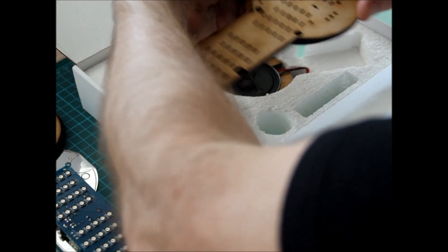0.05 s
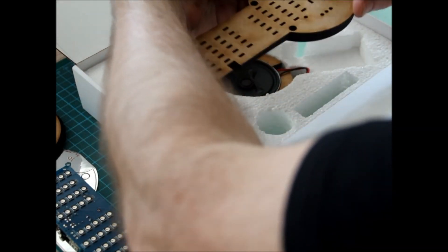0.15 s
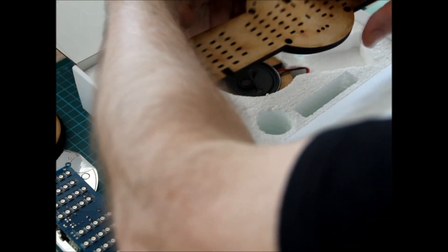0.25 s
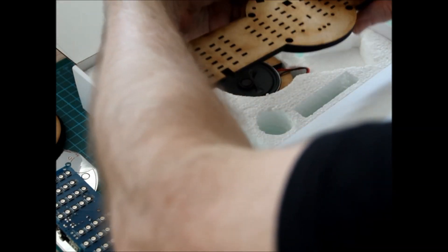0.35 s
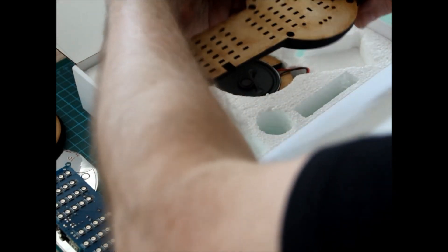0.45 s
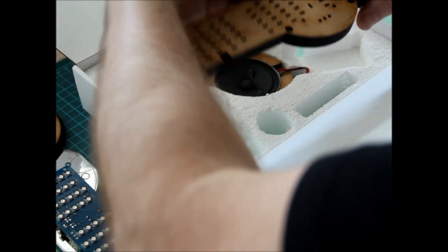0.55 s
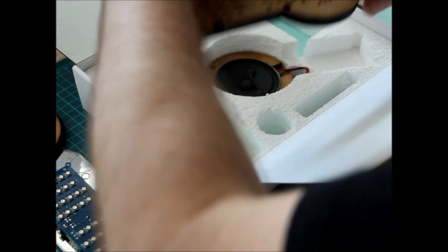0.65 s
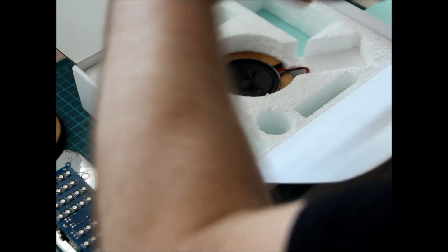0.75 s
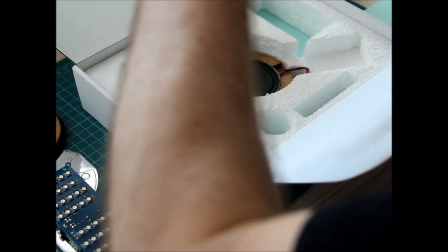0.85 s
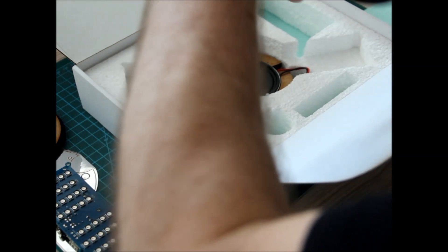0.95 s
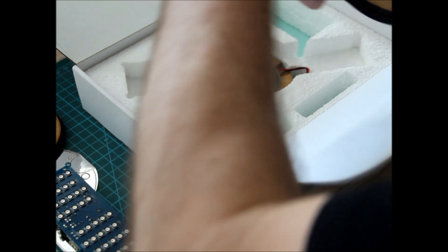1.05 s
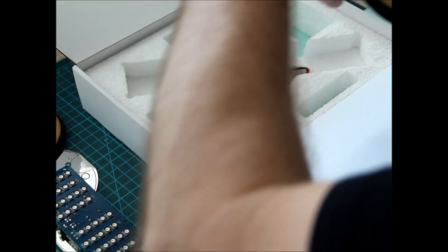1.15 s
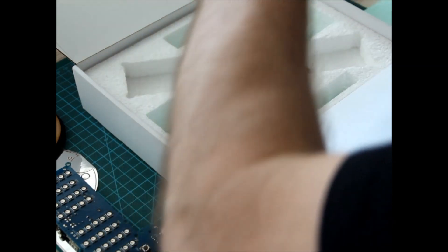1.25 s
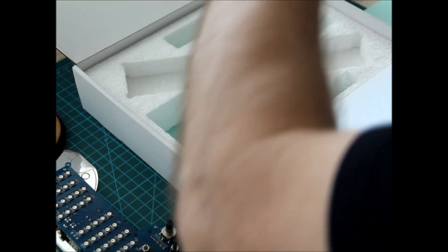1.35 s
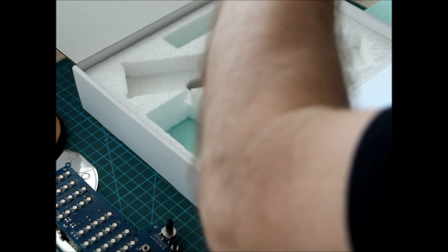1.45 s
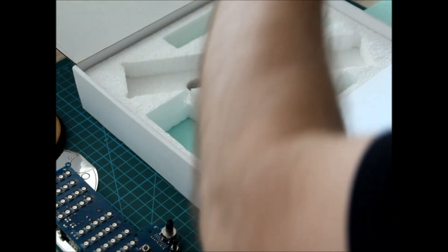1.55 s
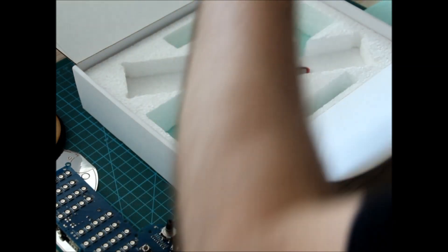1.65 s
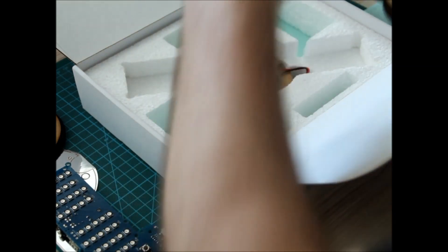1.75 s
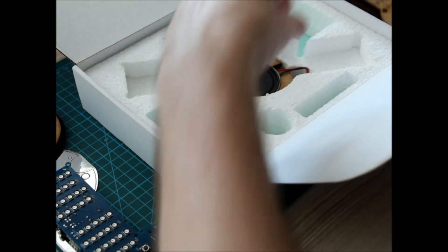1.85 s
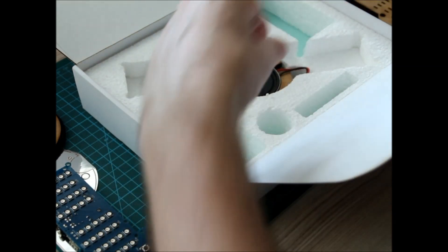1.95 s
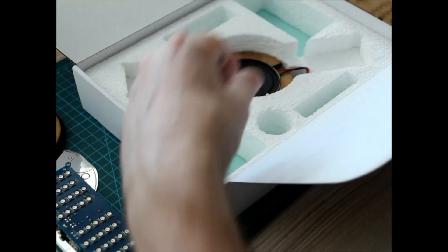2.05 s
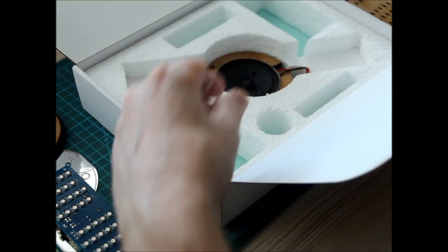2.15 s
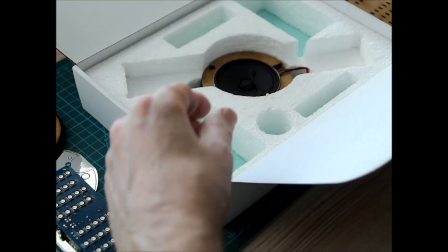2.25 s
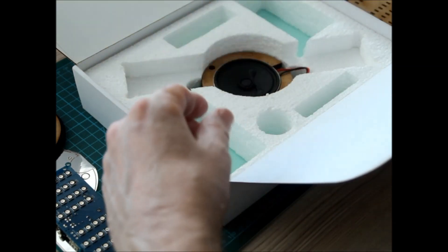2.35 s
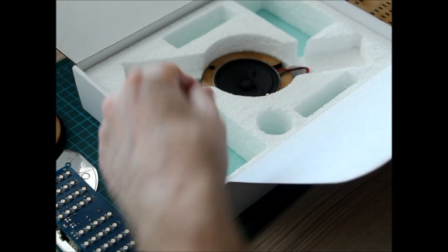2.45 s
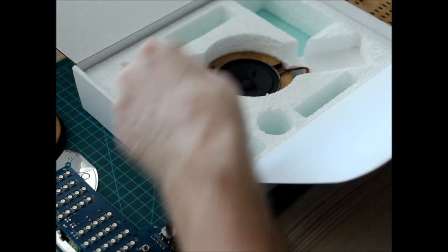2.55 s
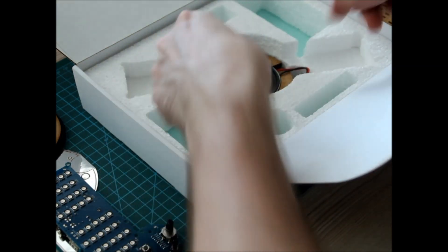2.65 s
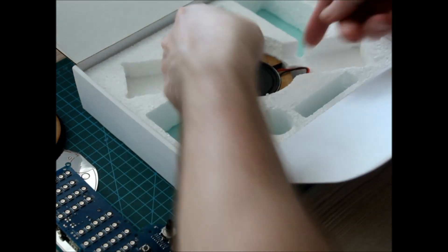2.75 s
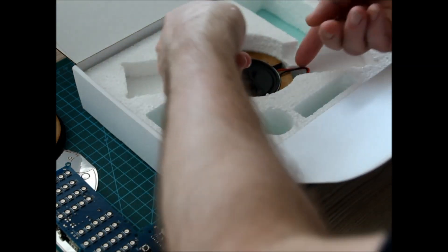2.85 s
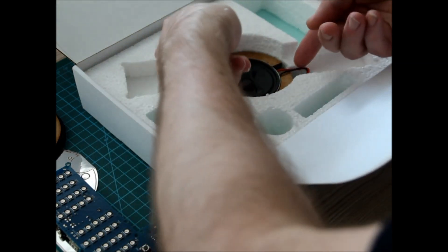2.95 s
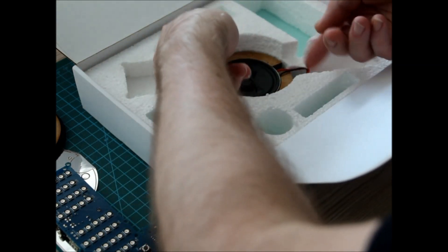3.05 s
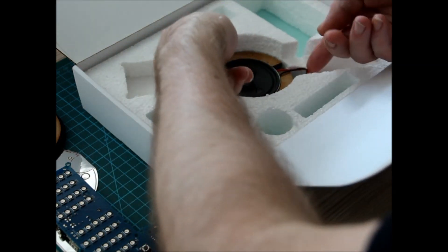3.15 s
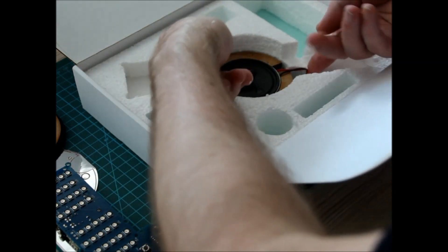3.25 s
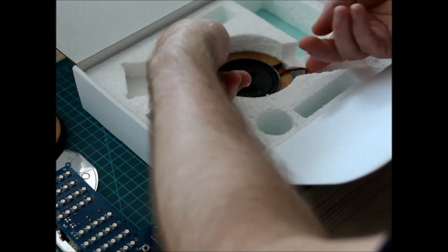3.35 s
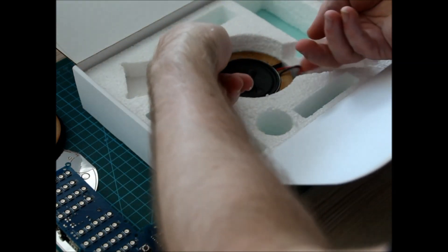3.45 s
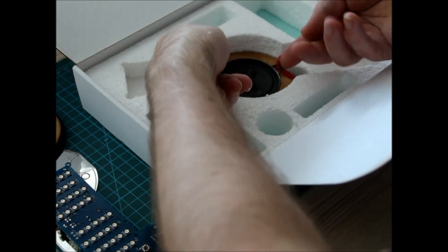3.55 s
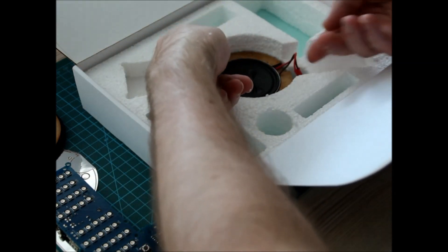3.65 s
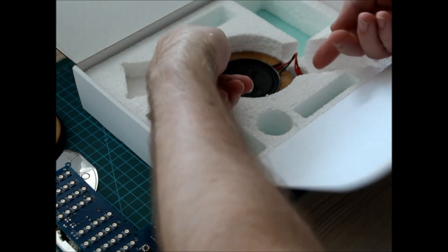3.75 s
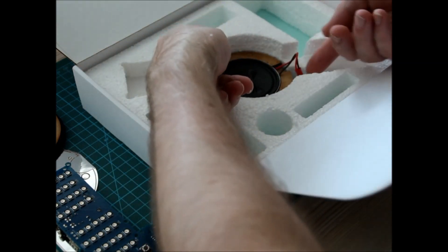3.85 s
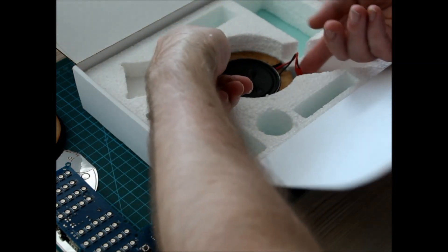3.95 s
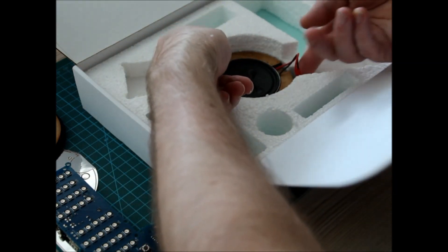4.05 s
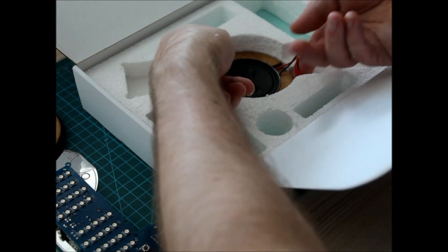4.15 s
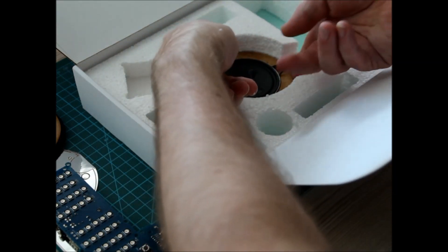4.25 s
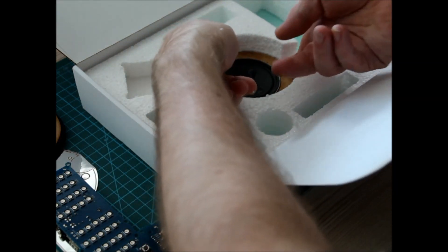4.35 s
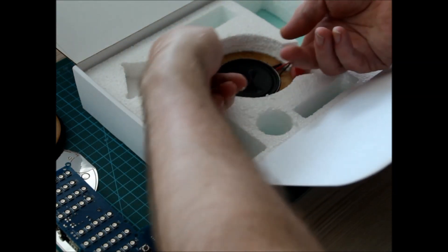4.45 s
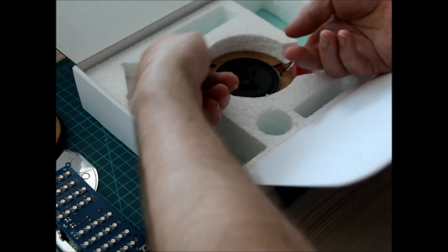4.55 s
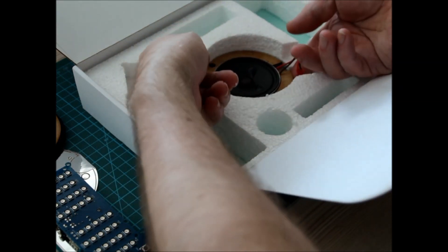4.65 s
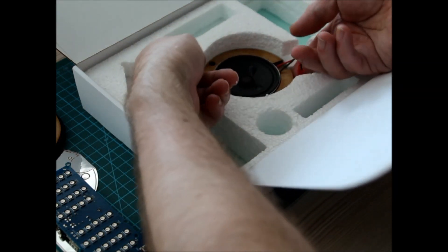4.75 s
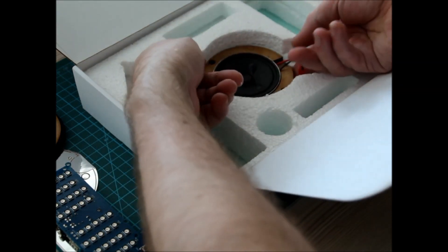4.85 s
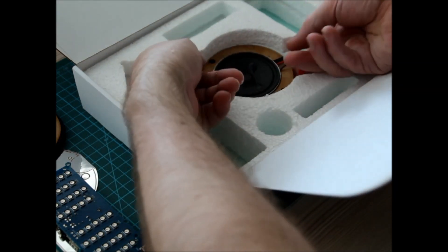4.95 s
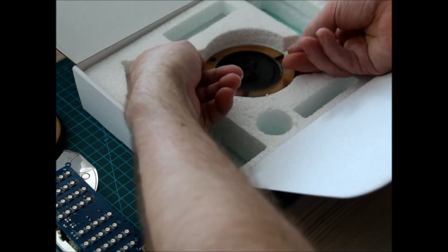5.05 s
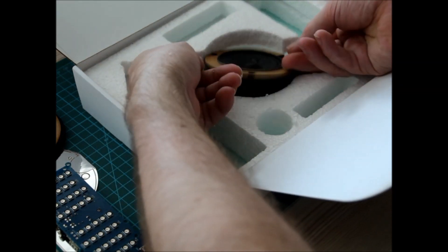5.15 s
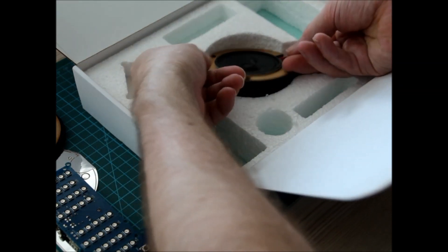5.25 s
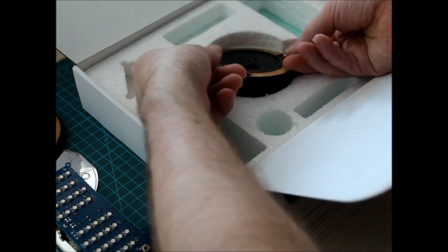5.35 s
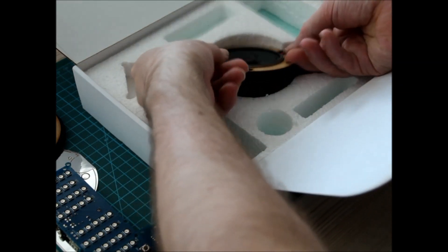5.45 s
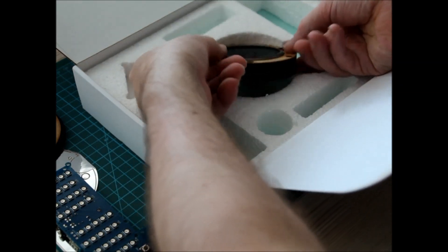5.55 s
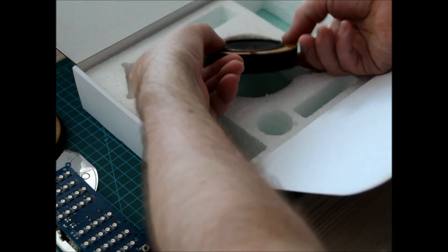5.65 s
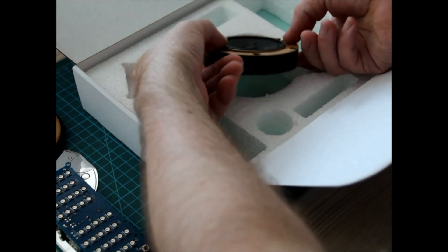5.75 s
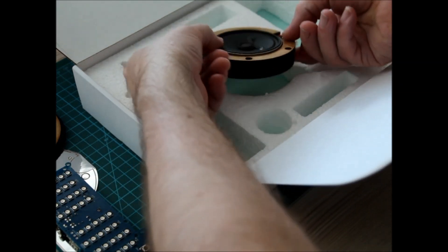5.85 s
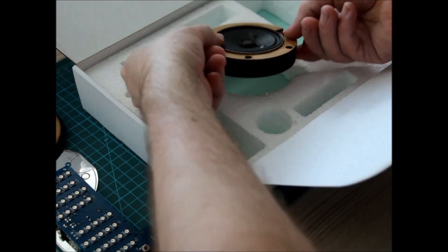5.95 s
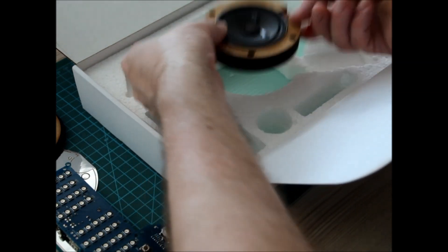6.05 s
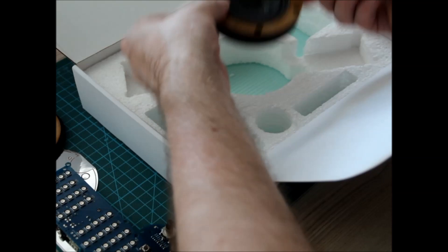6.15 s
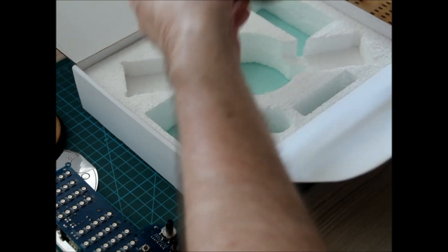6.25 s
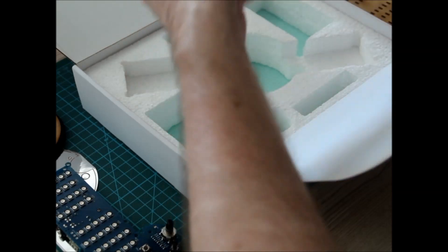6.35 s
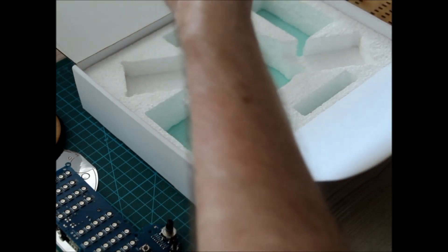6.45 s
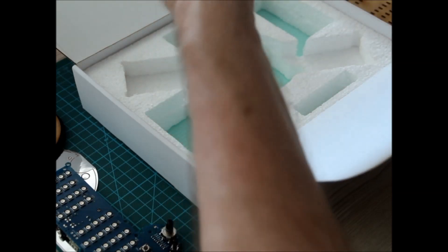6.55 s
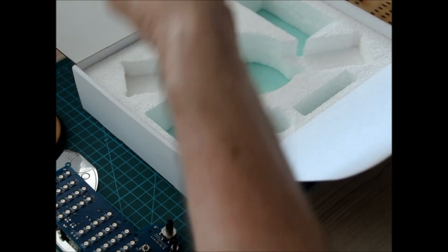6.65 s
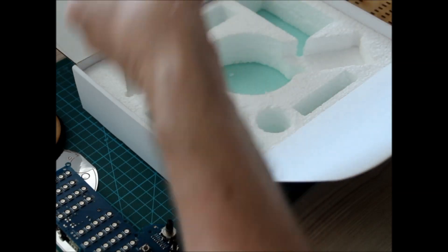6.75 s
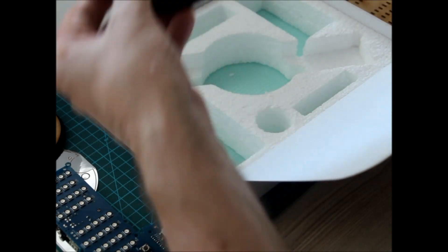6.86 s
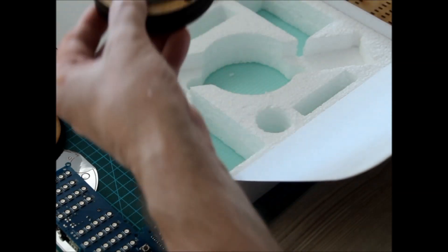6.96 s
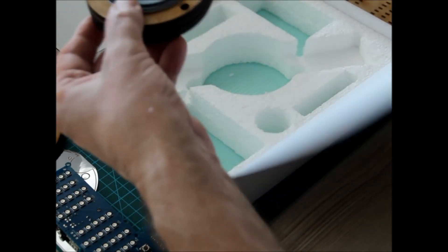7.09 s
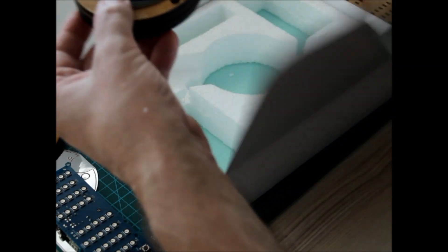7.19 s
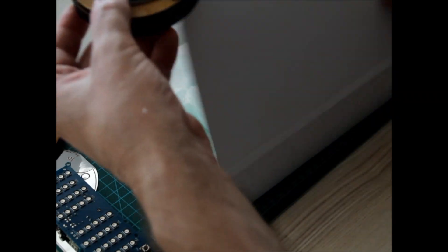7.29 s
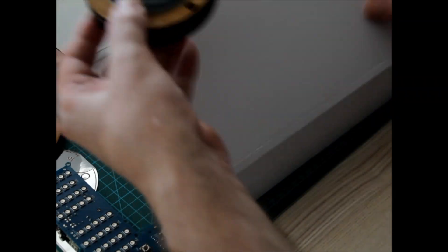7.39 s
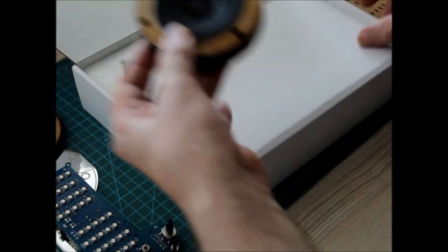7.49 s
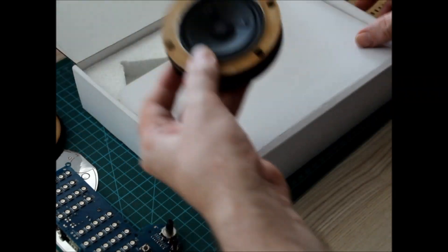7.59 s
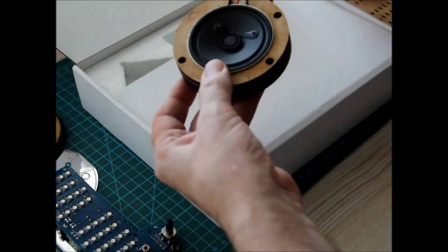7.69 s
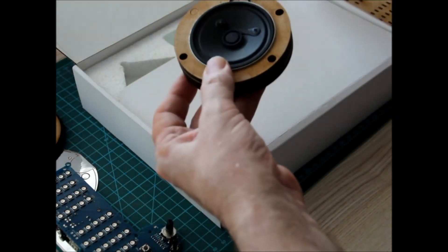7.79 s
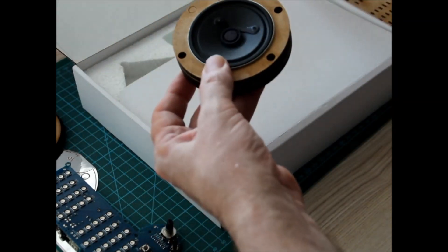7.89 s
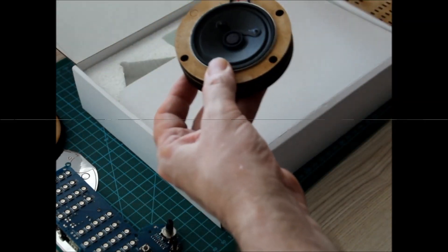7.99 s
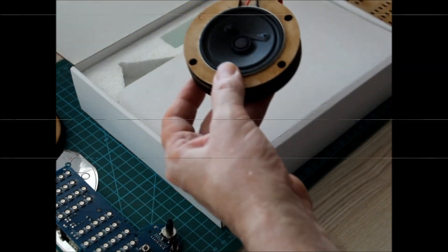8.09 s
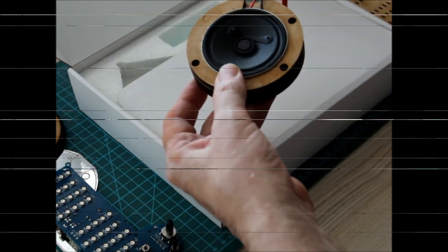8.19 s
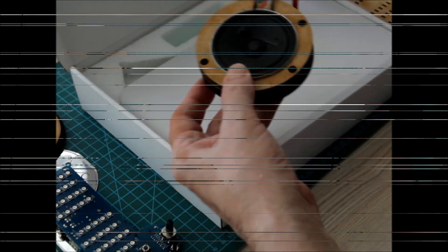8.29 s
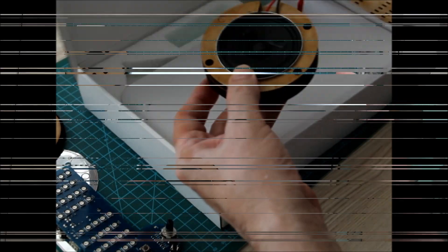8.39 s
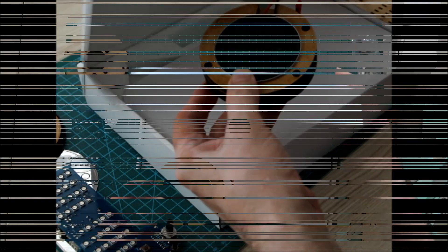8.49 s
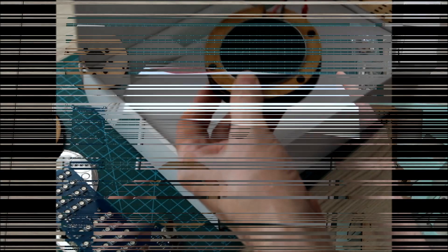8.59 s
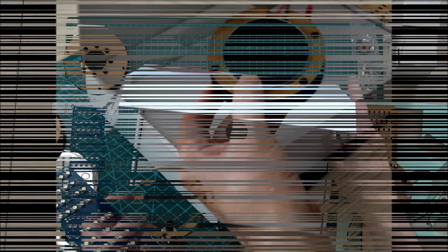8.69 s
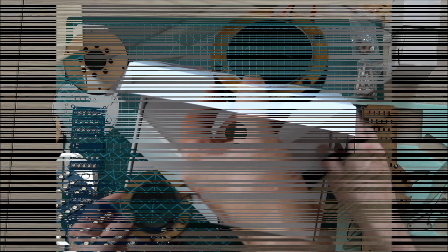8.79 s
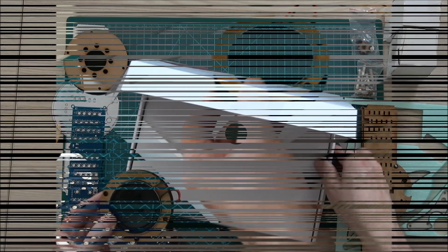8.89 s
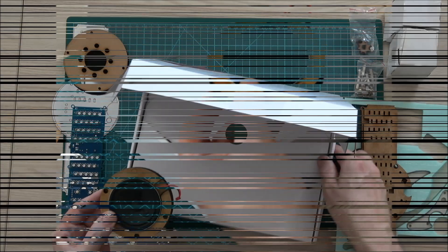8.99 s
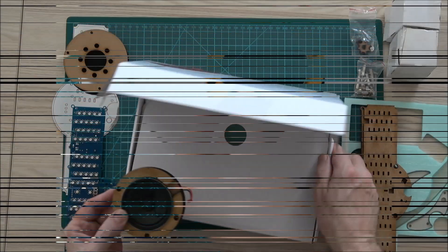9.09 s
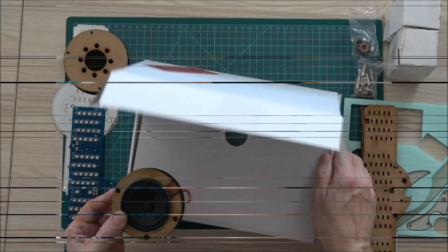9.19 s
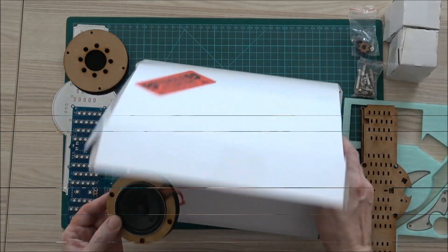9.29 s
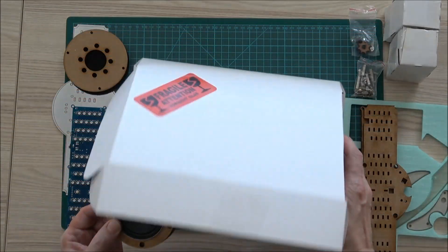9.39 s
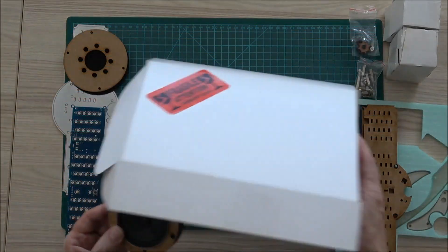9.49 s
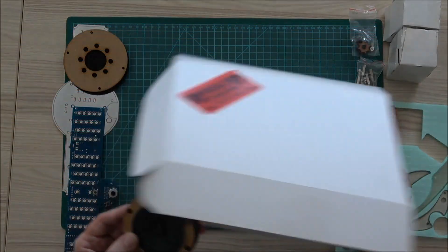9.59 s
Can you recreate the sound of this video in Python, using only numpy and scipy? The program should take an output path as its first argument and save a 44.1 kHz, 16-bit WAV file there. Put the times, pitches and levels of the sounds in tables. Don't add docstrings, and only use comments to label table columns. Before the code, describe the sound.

Close stereo handling of a boxed kit on a desk, with a low steady room hum. Faint foam rustles and a soft board settling come first, then stuttering foam scrapes, dry ticks and small knocks build to a forceful pull. After a quieter pause the card lid claps down. The view changes suddenly to louder box handling, with dull thuds, dragging card and low rumble carried through the microphone stand.

```python
import sys
import numpy as np
from scipy import signal
from scipy.fft import rfft, irfft
from scipy.io import wavfile
from scipy.ndimage import uniform_filter1d

SR = 44100
rng = np.random.default_rng(int(sys.argv[2]) if len(sys.argv) > 2 else 0)


def unload_audio(sound):
    columns = np.transpose(np.atleast_2d(sound))
    steps = np.round(np.clip(columns, -1, 1) * 32767)
    wavfile.write(sys.argv[1], SR, steps.astype(np.int16))


def gain_from_decibels(decibels):
    exponent = np.asarray(decibels, float) / 20
    return 10 ** exponent


N = 424683
SCENE_CHANGE_S = 8.05

# pitch_hz, level_db (per Hz)
AIR_SPECTRUM = [(12, -55), (20, -66), (53, -0.5), (177, -1.5), (285, -4.5), (388, -3.5), (527, -8),
                (660, -5), (873, -12.5), (1120, -8.5), (2460, -14), (10500, -25), (16000, -29.5)]
# pitch_hz, likeness (-1 to 1)
AIR_LIKENESS = [(60, 0.83), (130, 0.47), (290, 0.19), (640, -0.056), (1410, -0.18), (3100, -0.36),
                (6820, 0.018), (15000, -0.25)]
# pitch_hz, level_db
HUM_LINES = [(134.6, -61), (199.2, -66), (269.2, -67.5), (393.0, -90.5)]
# pitch_hz, level_db (per Hz)
FOAM_SPECTRUM = [(88, -64), (150, -0.5), (297, 3.5), (475, 12), (578, 3), (649, 9), (1360, -3.5),
                 (2020, -3.5), (2310, -6.5), (12000, -14), (16000, -26)]
# pitch_hz, level_db (per Hz)
CARD_SPECTRUM = [(150, -8), (250, -1), (780, 0), (1200, -6), (2200, -11), (5000, -19), (10000, -25),
                 (16000, -42)]
# pitch_hz, width_hz, level_db
BOX_MODES = [(286, 160, -6), (447, 72, -1.5), (570, 160, 3), (565, 33, -1), (778, 83, 8), (1016, 25, 13),
             (1100, 600, 12), (1560, 450, 21)]
FOAM_STROKES = [(0.0, 53, -58, -4, 2.5), (0.069, 110, -57, -6, 6), (0.28, 71, -63, -13, 6.5),
                (0.47, 75, -69, 7, 5.5), (0.68, 85, -73.5, 12, 5), (0.78, 40, -72, 15.5, 1),
                (2.123, 22, -44.5, -5, -16), (2.17, 110, -59, 4, -1), (2.41, 35, -53, -12, -6),
                (6.435, 26, -53, 0, -4), (6.52, 680, -63.5, 8, -21), (7.12, 60, -49, 1.5, -3.5),
                (7.18, 690, -55.5, 2, -12), (7.73, 120, -57, -11, -6.5), (7.84, 250, -55, -5, -20),
                (2.934, 143, -44, -3, -6), (3.09, 85, -44.5, -6, -6), (3.15, 53, -44.5, 0, -21),
               (3.22, 120, -45.5, -1.5, -12.5), (3.331, 41, -47, 6, 2), (3.398, 145, -39.5, -3.5, -9),
               (3.546, 22, -38, -1.5, -14), (3.559, 28, -32.5, -1.5, -9), (3.6, 140, -45.5, 1, -29),
               (3.915, 32, -43, -3, 0.5), (3.96, 71, -47.5, -2, 0), (4.025, 28, -39.5, 0.5, -8.5),
               (4.07, 142, -45.5, -2, -9), (4.2, 410, -55.5, 0.5, -8), (4.521, 58, -45, -2.5, -9),
               (4.555, 88, -40.5, -1.5, -7.5), (4.66, 120, -52, 1.5, -7), (4.729, 34, -47, -2, -2),
               (4.752, 53, -36.5, -3, -4.5), (4.82, 160, -44.5, 0.5, -10),
                (5.029, 20.5, -33.5, -11, -12.5), (5.06, 70, -41, -5.5, -10), (5.114, 31.3, -30, -4.5, -4),
                (5.144, 49, -29, 0, -2), (5.197, 48, -24, -4, -7.5), (5.302, 28.8, -30.5, 0, -10),
                (5.35, 305, -42, -1.5, -18), (5.519, 24.1, -28.5, 3, -5), (5.56, 55, -39.5, 0.5, -16),
                (5.648, 29, -36.5, 7.5, 0.5), (5.7, 240, -42, -4, -11.5), (5.837, 24, -34, 2, -5),
                (5.88, 260, -59, 6, -11), (6.158, 29.3, -38.5, -4, -4.5), (6.2, 190, -52, -29, -17)]
DRAG_STROKES = [(1.135, 60.4, -45, -5, -12), (1.24, 63.6, -39, -13, -18), (1.33, 130, -49.5, 1, -17),
                (7.572, 22.3, -35.5, 14, -10), (7.652, 45.37, -45, 5, -8), (8.0, 78.6, -39.5, 4.5, -10),
                (8.088, 67.4, -28.5, 3, -18), (8.15, 149, -33, 1.5, -10), (8.29, 115.7, -42.5, 11.5, -14),
                (8.41, 51, -34.5, 3, -15), (8.52, 56, -28.5, 0, -20), (8.65, 119, -39.5, 5.5, -11.5),
                (8.75, 150, -42.5, 4.5, -12), (8.92, 65.5, -43, 12.5, -13), (8.99, 132, -44, 5, -14),
                (9.135, 30, -34.5, 2, -3), (9.155, 65, -30, -1.5, -5.5), (9.24, 90.74, -41, 3.5, -9),
                (9.36, 162, -38.5, 6, -12), (9.45, 98, -34, -0.5, -15.5), (9.555, 73.44, -36.5, 1.5, -1.5)]
STROKE_SAG_DB = [-1.5, -3, -1, 0]
# start_s, length_ms, level_db, pitch_hz, width_hz
RUBBED_RINGS = [(0.0, 57, -58, 4050, 900), (0.12, 57, -62, 2750, 1200), (0.325, 20, -65, 2520, 800),
                (0.68, 160, -70.5, 6100, 1000), (1.0, 70, -69, 10000, 4500), (1.137, 89, -60.5, 3600, 1400),
                (1.241, 70, -50.5, 3320, 1400), (2.127, 30, -50, 2250, 300), (2.127, 43, -53.5, 3180, 160),
                (3.05, 57, -55, 4680, 600), (3.03, 40, -55, 1960, 300), (3.33, 38, -54, 8600, 2500),
                (3.4, 70, -53.5, 6500, 700), (3.42, 54, -56, 9400, 1200), (3.92, 22, -47.5, 2470, 400),
                (3.918, 24, -51, 4300, 500), (3.958, 24, -47, 8850, 2500), (4.07, 70, -54, 1980, 250),
                (4.55, 40, -51, 2010, 200), (4.755, 48, -51, 2060, 300), (4.855, 30, -53, 1840, 400),
                (5.03, 15, -66, 8900, 2500), (5.522, 10, -42, 4260, 500), (5.522, 13, -47, 11200, 594),
                (5.648, 20, -50, 7120, 500), (5.653, 15, -47, 10200, 1500), (5.836, 11, -46, 1910, 400),
                (5.655, 35, -39, 520, 200), (5.905, 15, -58, 2200, 400), (0.77, 72, -58, 373, 150),
                (7.572, 24, -38.5, 1300, 700), (7.572, 29, -36, 510, 251), (8.09, 115, -34.5, 716, 350),
                (8.31, 92, -36.5, 330, 150), (8.74, 56, -40.5, 443, 120), (8.925, 75, -38, 520, 250),
                (9.14, 53, -40.5, 610, 200), (9.15, 46, -45.5, 10700, 1500), (9.149, 35, -45.5, 6300, 1200),
                (9.465, 35, -36.5, 1900, 600)]
# start_s, peak_db, pitch_hz
SNAPS = [(0.078, -38, 6500), (2.166, -31.5, 9500), (2.178, -39, 8500), (3.131, -38, 3700),
         (3.213, -28, 3500), (3.287, -34, 10500), (3.3, -39, 12500), (3.313, -45, 12500),
         (3.0064, -32, 3720), (3.3343, -35, 2640), (3.4047, -39, 2790), (3.468, -31, 3640),
         (3.504, -30, 5000), (3.5224, -18.5, 8700), (4.523, -36, 4520), (4.6124, -34, 4370),
         (4.445, -42, 6000), (4.5097, -43, 5000), (4.538, -39, 8000), (4.589, -27, 10000),
         (4.634, -43, 7500), (4.7564, -25, 4010), (4.856, -30.5, 4440), (4.93, -36, 2480),
         (5.0895, -33, 2210), (5.121, -23, 11000), (5.136, -16, 10000), (5.178, -16, 9000),
         (5.505, -36, 9000), (5.906, -34, 7000), (6.318, -48, 3640), (6.348, -42, 2750),
         (5.4154, -25, 3600), (5.471, -31, 3800), (5.772, -26, 4240), (5.806, -24, 5900),
         (7.344, -35, 3530), (7.7092, -36, 4100), (7.757, -28.5, 6100), (8.421, -28, 6030),
         (8.908, -39, 6500), (8.935, -41, 10000), (9.075, -34, 8000), (9.123, -30, 12000),
         (9.408, -30, 8500)]
# start_s, length_ms, level_db
BOARD_CONTACTS = [
    (1.135, 56, -45),
    (1.239, 59, -33),
    (1.301, 110, -63),
]
# pitch_hz, width_hz, level_db
BOARD_RESONANCES = [(340, 49, -3), (757, 70, 1.5), (870, 80, 2)]
# start_s, peak_db, pitch_hz, length_ms, body_db (box body relative to the peak)
DULL_KNOCKS = [(1.138, -33, 400, 1.6, -3), (2.131, -30.5, 2140, 4.8, -8), (2.143, -23, 2220, 3.8, -26),
               (3.102, -26, 3020, 2.9, -22), (3.349, -21, 1180, 3.5, -22), (3.654, -23.5, 2180, 1.7, -8),
               (3.928, -25, 720, 5.2, -39), (3.959, -26.5, 2810, 4, -24), (5.034, -25, 1090, 5.1, -32),
               (5.132, -18, 1540, 5.4, -26), (5.533, -16.5, 1690, 3, -32), (5.665, -22, 490, 10, -17),
               (6.166, -27, 375, 9.3, -56), (7.123, -34.5, 875, 3.9, 1), (7.571, -14.5, 960, 1.8, -11.5),
               (7.582, -31, 790, 6.4, -3), (7.652, -22.5, 820, 3.3, 4.5), (8.121, -8, 740, 2.7, -14),
               (8.136, -28, 810, 1.6, -22), (8.49, -25, 910, 3.6, -11), (8.528, -19, 667, 9.7, -10),
               (8.564, -10.5, 758, 3.4, -20), (8.986, -17.5, 2190, 0.99, -8), (9.474, -22, 1770, 3.6, -27)]
# start_s, peak_db, pitch_hz, t60_s
DESK_THUMPS = [
    (1.168, -41, 115, 0.28),
    (1.379, -49, 61, 0.22),
    (1.895, -40, 66.4, 0.27),
    (2.429, -43.5, 67, 0.41),
    (3.003, -41, 66, 0.26),
    (3.099, -45, 58.3, 0.32),
    (3.619, -53, 63, 0.35),
    (7.64, -49, 86, 0.51),
    (7.8, -53.5, 62, 0.6),
]
# start_s, peak_db, pitch_hz, length_ms
PART_SLIPS = [(2.415, -29.5, 2580, 0.71), (2.934, -31, 2960, 3), (3.15, -28, 456, 6.1),
              (3.327, -28, 1200, 6.6), (3.566, -17, 2600, 8), (4.038, -21, 2600, 3.3),
              (4.556, -25, 2060, 3.9), (4.586, -25, 1470, 2.1), (4.772, -18.5, 1940, 2.7),
              (5.023, -27.5, 3280, 2.1), (5.116, -15.5, 1900, 2.2), (5.151, -12.5, 2080, 5.2),
              (5.176, -13.5, 1100, 2.5), (5.314, -23.5, 635, 5), (5.525, -10, 1710, 1.46),
              (5.654, -16, 1670, 4.3), (5.837, -22.5, 1890, 1.6), (6.434, -38, 660, 5),
              (8.089, -18, 580, 3.6)]
# time_s, pitch_hz, level_db
LID_SQUEAK = [
    (7.835, 8850, -69),
    (7.87, 9150, -68),
    (7.905, 9240, -66),
    (7.929, 9000, -74),
    (7.955, 8750, -70.5),
    (7.973, 9100, -62),
    (7.992, 9290, -63),
    (8.02, 8750, -73),
    (8.05, 7800, -70),
]
# time_s, rumble_db, sway_db
STAND_SHAKE = [
    (8.05, -33, -51),
    (8.45, -33, -52),
    (8.8, -37.5, -47),
    (9.25, -35, -38.5),
    (9.63, -38.5, -41),
]
# pitch_hz, width_hz, level_db
DESK_MODES = [(60.6, 11, 5.5), (94, 205, -3), (136, 13, 1), (215, 480, -14)]
# start_s, peak_db, pitch_hz, t60_s
BOX_BUMPS = [
    (8.083, -19.5, 209, 0.15),
    (8.335, -18.5, 203, 0.092),
    (8.54, -18.5, 222, 0.085),
    (8.766, -19.5, 215, 0.1),
    (9.046, -21.5, 148, 0.11),
    (9.208, -31.5, 219, 0.22),
    (9.422, -26.5, 142, 0.12),
    (9.518, -20, 161, 0.074),
]
# pitch_hz, t60_s, level_db
ROOM_BANDS = [(110, 0.15, -0.5), (264, 1, -6), (469, 0.74, -6.5), (937, 0.69, -4), (2036, 0.62, -5),
              (4270, 0.77, -5), (7450, 0.51, -8), (14100, 0.77, -12)]
# pitch_hz, likeness
ROOM_LIKENESS = [(125, 0.91), (500, 0.96), (1400, 0.75), (3000, 0.5), (7000, 0.24), (15000, .02)]


def unit(x):
    return x / np.sqrt(np.mean(x ** 2))


def add_at(out, start_s, sound):
    at = int(start_s * SR)
    out[..., at:at + sound.shape[-1]] += sound


def decay(t, t60_s):
    return np.exp(-np.log(1000) * t / t60_s)


def on_log(table, hz):
    points = np.array(table)
    return np.interp(np.log(np.maximum(hz, 1)), np.log(points[:, 0]), points[:, 1])


def colour(x, spectrum, size=8192):
    cepstrum = irfft(np.log(gain_from_decibels(on_log(spectrum, np.fft.rfftfreq(size, 1 / SR)))))
    cepstrum[1:size // 2] *= 2
    cepstrum[size // 2 + 1:] = 0
    response = irfft(np.exp(rfft(cepstrum)))
    return signal.fftconvolve(x, response)[:len(x)]


def band(x, lo_hz, hi_hz, order=2):
    sos = signal.butter(order, [lo_hz, min(hi_hz, .45 * SR)], "bandpass", fs=SR, output="sos")
    return signal.sosfilt(sos, x)


def ring(x, hz, width_hz):
    return signal.lfilter(*signal.iirpeak(hz, hz / width_hz, fs=SR), x)


def ring_twice(x, hz, width_hz):
    return ring(ring(x, hz, width_hz), hz, width_hz)


def modes(x, table):
    return sum((-1) ** k * gain_from_decibels(db) * ring(x, hz, width) for k, (hz, width, db) in enumerate(table))


def spread(mid, side, alike):
    likeness = np.clip(on_log(alike, np.fft.rfftfreq(len(mid), 1 / SR)), -.9, .99)
    m = irfft(rfft(mid) * np.sqrt(1 + likeness), len(mid))
    s = irfft(rfft(side) * np.sqrt(1 - likeness), len(mid))
    return np.array([m + s, m - s]) / np.sqrt(2)


def walk(rate_hz):
    k = int(SR / rate_hz)
    held = np.repeat(rng.standard_normal(N // k + 1), k)
    return 1.3 * uniform_filter1d(uniform_filter1d(held, k), k)[:N]


def beads(length, per_s, tail_db, smooth):
    slip = rng.random(length) < per_s / SR
    size = gain_from_decibels(tail_db * np.minimum(rng.exponential(size=length), 2.5))
    size = size * rng.choice([-1., 1.], length)
    return unit(unit(slip * size + 1e-9) + smooth * rng.standard_normal(length))


def box_walls(x):
    return modes(x, BOX_MODES)


def strokes(table, coarse, fine, crackle, walls, stutter_db, stutter_rate):
    scrape = band(coarse, 1088, 3350)
    body = walls * unit(band(box_walls(coarse), 314, 925)) + unit(band(coarse, 256, 1050))
    crackling = band(fine, 2415, 9080)
    bright = band(fine, 7040, 14800)
    layers = np.array([unit(x) for x in (scrape, body, crackling, bright)])
    crackle_db, crackle_share = crackle
    power = np.zeros((4, N + SR))
    for s, ms, db, hollow_db, bright_db in table:
        along = np.linspace(0, 1, int(1.217 * max(ms, 8) / 1000 * SR))
        shape = np.clip(np.minimum(along / 0.053, (1 - along) / 0.34), 0, 1) ** 2
        mix_db = np.array([0, hollow_db, crackle_db + crackle_share * bright_db, bright_db])
        level_db = db + mix_db[:, None] + np.outer(STROKE_SAG_DB, along - .4)
        add_at(power, s, gain_from_decibels(level_db) ** 2 * shape)
    wander = gain_from_decibels(1.3 * np.array([walk(45.) for _ in layers]))
    stutter = gain_from_decibels(stutter_db * walk(stutter_rate))
    return stutter * np.sum(wander * layers * np.sqrt(power[:, :N]), axis=0)


def air():
    rush = np.zeros((2, N))
    noise = [colour(rng.standard_normal(N), AIR_SPECTRUM) for _ in range(2)]
    for lo_hz in 20 * 2. ** np.arange(10):
        rush += gain_from_decibels(0.33 * walk(3.44)) * np.array([band(x, lo_hz, 2 * lo_hz, order=1) for x in noise])
    hum = sum(gain_from_decibels(db) * unit(ring(rng.standard_normal(N), hz, 14.3)) for hz, db in HUM_LINES)
    return gain_from_decibels(-50.5 - 1.62) * unit(spread(*rush, AIR_LIKENESS)) + hum


def rubbing():
    coarse = colour(beads(N, per_s=2000., tail_db=3.0, smooth=1.0), FOAM_SPECTRUM)
    fine = colour(beads(N, per_s=2500., tail_db=5.5, smooth=0.48), FOAM_SPECTRUM)
    table = FOAM_STROKES
    return gain_from_decibels(-4.0) * strokes(table, coarse, fine, crackle=(7.5, 1), walls=0.83, stutter_db=2.0, stutter_rate=80.)


def rings():
    out = np.zeros(N + SR)
    grip = gain_from_decibels(3.0 * walk(70.)) * beads(N, per_s=600., tail_db=4.5, smooth=0.4)
    for s, ms, db, hz, width_hz in RUBBED_RINGS:
        length = ms / 1000 * SR
        along = np.arange(int(length) + 1024) / length
        shape = np.clip(np.minimum(along / 0.16, (1 - along) / 0.35), 0, 1)
        rub = grip[int(s * SR) + np.arange(len(along))] * shape
        tone = unit(ring_twice(rub, hz, width_hz))
        add_at(out, s, gain_from_decibels(db) * tone * np.sqrt(len(rub) / length))
    return out[:N]


def ticks():
    size = 4096
    out, t = np.zeros(N + size), np.arange(size) / SR
    for s, db, hz in SNAPS:
        crack = decay(t, 0.0078) * rng.standard_normal(size)
        snap = ring_twice(crack, hz, 0.78 * hz) + 0.5 * band(crack, 1700, 11000)
        add_at(out, s, gain_from_decibels(db) * snap / np.abs(snap).max())
    return out[:N]


def dragging():
    card = colour(beads(N, per_s=3000., tail_db=6.5, smooth=0.97), CARD_SPECTRUM)
    return gain_from_decibels(-3.0) * strokes(DRAG_STROKES, card, card, crackle=(2, 0.38),
                               walls=0.55, stutter_db=1.5, stutter_rate=70.0)


def board():
    t = np.arange(N) / SR
    settle = sum(gain_from_decibels(db) * ((t > s) & (t < s + ms / 1000)) for s, ms, db in BOARD_CONTACTS)
    chatter = settle * beads(N, per_s=600., tail_db=0.0, smooth=0.78)
    return modes(chatter, BOARD_RESONANCES) * gain_from_decibels(17.5)


def knocks_and_slips():
    size = 4096
    out, t = np.zeros(N + size), np.arange(size) / SR
    rows = [(*row, -19, -3.5) for row in PART_SLIPS]
    rows += [(*row, -29) for row in DULL_KNOCKS]
    for s, db, hz, ms, body_db, crackle_db in rows:
        fade_s = max(ms, .5) / 1000
        shape = (1 - np.exp(-t / (0.00048 + 0.4 * fade_s))) * np.exp(-t / fade_s)
        clump = beads(size, per_s=3000.0, tail_db=4.5, smooth=0.6) * shape
        tone = ring(ring(clump, hz, .6 * hz), hz, .32 * hz)
        around = band(clump, 0.4 * hz, 2.37 * hz)
        body = band(clump, 270, 975)
        crackle = band(clump, 2600, 11200)
        parts = [(tone, -6.0), (around, -7.0), (body, body_db), (crackle, crackle_db)]
        add_at(out, s, sum(gain_from_decibels(db + gain_db) * x / np.abs(x).max() for x, gain_db in parts))
    return out[:N]


def thumps(table):
    age, out = np.arange(SR // 2) / SR, np.zeros(N + SR)
    push = 1 - np.exp(-age / 0.025)
    for s, db, hz, t60_s in table:
        add_at(out, s, gain_from_decibels(db + 5.5) * push * decay(age, t60_s) * np.sin(2 * np.pi * hz * age))
    return out[:N]


def squeak():
    s, hz, db = np.transpose(LID_SQUEAK)
    t = np.arange(N) / SR
    phase = 2 * np.pi * np.cumsum(np.interp(t, s, hz)) / SR
    level_db = np.interp(t, s, db, left=-120, right=-120) + 2.2 * walk(80.)
    return np.sqrt(2) * gain_from_decibels(level_db) * np.sin(phase)


def shake():
    s, rumble_db, sway_db = np.transpose(STAND_SHAKE)
    t = np.arange(N) / SR
    rumble = unit(modes(rng.standard_normal(N), DESK_MODES))
    rumble = rumble * gain_from_decibels(np.interp(t, s, rumble_db) + 2.6 * walk(9.))
    sway = unit(ring_twice(rng.standard_normal(N), 30.0, 24.0))
    return rumble + sway * gain_from_decibels(np.interp(t, s, sway_db))


def room(x, wet_db, near_db):
    t = np.arange(SR) / SR
    tails = np.zeros((2, SR))
    for hz, t60_s, db in ROOM_BANDS:
        fade = (1 - np.exp(-t / 0.00098)) * decay(t, t60_s)
        octave = fade * band(rng.standard_normal((2, SR)), hz / np.sqrt(2), hz * np.sqrt(2))
        tails += gain_from_decibels(db + wet_db) * octave * np.sqrt(2 / np.sum(fade ** 2))
    near = band(rng.standard_normal(SR), 7700, 16600, order=1) * np.exp(-t / 0.0075)
    scatter = gain_from_decibels(near_db) * np.outer([1, -1], near / np.linalg.norm(near))
    response = spread(*tails, ROOM_LIKENESS) + scatter
    return x + signal.fftconvolve(x[None], response, axes=1)[:, :N]


def scene():
    sample = np.arange(N)
    after = sample >= SCENE_CHANGE_S * SR
    later = sample >= (SCENE_CHANGE_S - .06) * SR
    handling = knocks_and_slips() + ticks() + rings() + dragging()
    unpacking = rubbing() + board() + squeak() + handling * ~later
    first = room(unpacking, wet_db=1.0, near_db=-8.0) + thumps(DESK_THUMPS) + air()
    folding = (handling + thumps(BOX_BUMPS)) * later
    second = room(folding, wet_db=1.5, near_db=-28.0) + shake()
    return np.where(after, second, first)


def band_limit(x):
    return signal.sosfilt(signal.butter(12, 15895, fs=SR, output="sos"), x)


def record(dry):
    low_pass = signal.ellip(10, .3, 45, 15880, fs=SR, output="sos")
    mix = signal.sosfilt(low_pass, dry)
    return band_limit(mix)


dry = scene()
out = record(dry)
unload_audio(out)
```